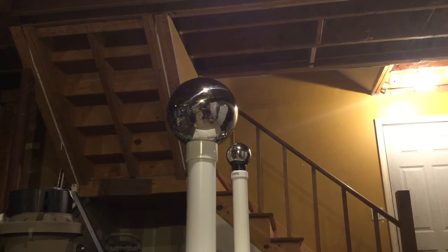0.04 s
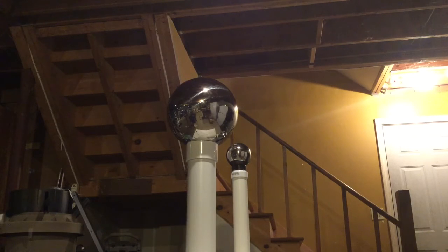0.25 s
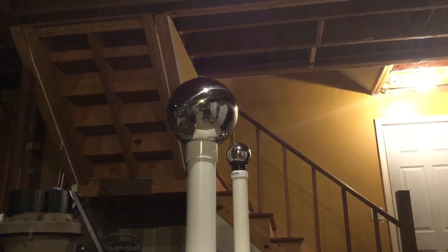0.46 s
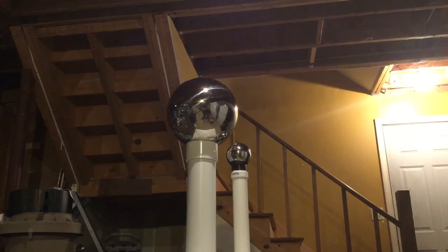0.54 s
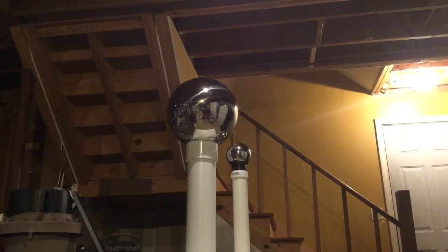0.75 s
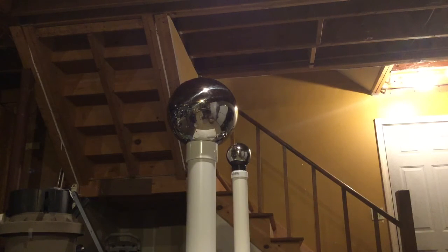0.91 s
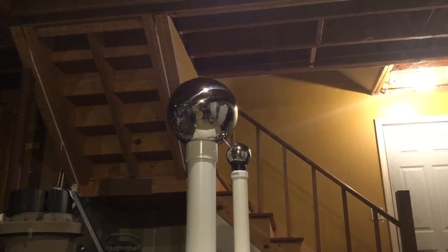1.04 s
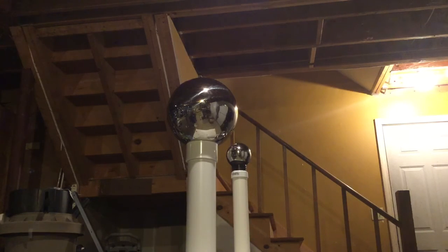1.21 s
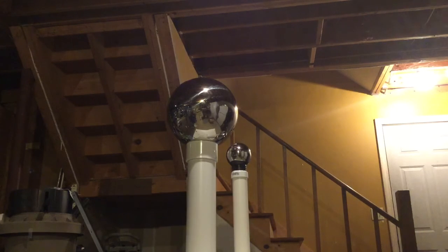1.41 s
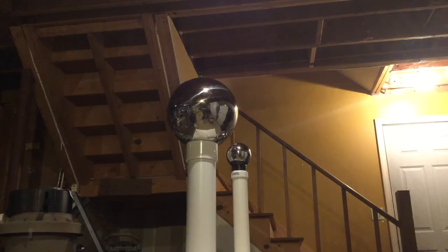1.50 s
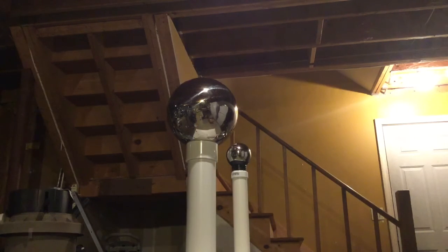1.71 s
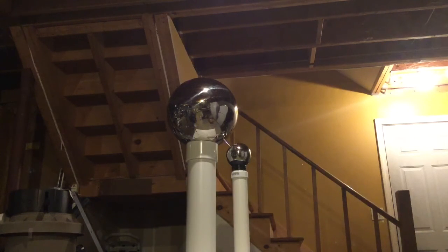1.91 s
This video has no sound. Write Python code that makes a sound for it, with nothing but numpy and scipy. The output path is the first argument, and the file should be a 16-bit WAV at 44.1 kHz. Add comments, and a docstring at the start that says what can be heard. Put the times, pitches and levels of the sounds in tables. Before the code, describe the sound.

Electric sparks snap between two metal spheres four times, evenly spaced. Each bright crack has a short sizzling echo and a thump from the overloaded microphone. A generator's motor and belt hum faintly in a basement room.

```python
"""Sharp electric snaps, about two a second, in a basement room.
An electrostatic generator throws sparks between two metal spheres. Each spark is a bright crack,
a close echo and a short sizzling room tail. Its shock overloads the microphone, which swings back
with a falling thump. The motor and belt run faintly underneath."""
import sys
import numpy as np
from scipy import signal
from scipy.fft import rfft, irfft
from scipy.io import wavfile
from scipy.ndimage import uniform_filter1d

SR = 44100
rng = np.random.default_rng(int(sys.argv[2]) if len(sys.argv) > 2 else 0)


def output_pcm(signal):
    """Save a mono or channel-first signal as 16-bit PCM at the path in sys.argv[1].

    Samples are clipped to [-1, 1] before scaling.
    """
    pcm = np.clip(np.atleast_2d(signal).T, -1, 1) * 32767
    wavfile.write(sys.argv[1], SR, np.round(pcm).astype(np.int16))


N = 85995

# The sparks; the first is already dying away when the sound begins. Each row: start in seconds,
# level of the crack and its tail in dB, thump level in dB, thump pitch factor, midrange bite in dB.
SPARKS = [(-.108, 0, -10, 1.0, 0), (.2079, -1, 4, 1.02, -2), (.6998, 0, .2, .98, 1),
          (1.1607, .5, .6, .99, 1), (1.6022, -.4, 0, .95, -.5)]
WANDER = 0.4  # how much of the room's answer changes with the path of each spark

def sparks():
    """Every spark jumps the same gap, so all share nearly the same reflections."""
    t, out = np.arange(SR // 2) / SR, np.zeros(N)
    shared_tail = np.sqrt(1 - WANDER ** 2) * room(t) + ring(t)
    for start, crack_db, thump_db, pitch, bite_db in SPARKS:
        snap = crack(t, bite_db) + shared_tail + WANDER * room(t)
        add(out, start, amp(crack_db) * snap + amp(thump_db) * thump(t, pitch))
    return out


# Tone colours (how strong the lows and highs are) of the crack, its midrange bite, the close echo
# off a hard surface and the wall echoes. Each row: frequency in Hz, gain in dB.
CRACK_COLOUR = [(150, -25), (1500, -12), (3000, -4), (4800, -4), (7000, -4), (9000, -2), (10500, 0),
                (12700, 10), (14000, 4), (15500, 3), (16800, -6)]
BITE_COLOUR = [(150, 11.5), (400, -2.5), (560, 17.5), (800, 10), (1200, 10.5), (1700, 9.5), (2100, 9),
               (3000, 5), (5000, -18), (16000, -17)]
ECHO_COLOUR = [(150, -14), (1000, -6), (2200, -2), (4200, -5), (5500, 2), (6800, 4), (8500, 3), (10000, 0),
               (12500, 7), (14000, 5), (15500, 0), (16800, -12)]
WALL_COLOUR = [(150, -11), (1000, -5.5), (3000, -13), (6000, -5.5), (13000, -10), (16800, -26)]
# Later echoes from beams and walls. Each row: delay in seconds, gain in dB.
WALL_ECHOES = [(.0105, -9), (.0187, -6), (.024, -10)]
SHOCK_DB, CRACKLE_DB, CRACKLE_S = -1, -4, .0005
BITE_SCATTER, BITE_SCATTER_S = .5, .003
CLOSE_ECHO_S = .00268

def crack(t, bite_db):
    """One shock in the air, with a ragged edge and a midrange bite, then its separate echoes."""
    crackle = rng.standard_normal(len(t)) * np.exp(-t / CRACKLE_S)
    bite = rng.standard_normal(len(t)) * t * np.exp(-2 * t / BITE_SCATTER_S)
    out = amp(CRACKLE_DB) * tint(crackle / np.linalg.norm(crackle), CRACK_COLOUR)
    out += amp(bite_db) * BITE_SCATTER * tint(bite / np.linalg.norm(bite), BITE_COLOUR)
    shock = -amp(SHOCK_DB) * click(CRACK_COLOUR) - amp(bite_db) * click(BITE_COLOUR)
    add(out, 0, shock)
    add(out, CLOSE_ECHO_S, click(ECHO_COLOUR))
    for delay, db in WALL_ECHOES:
        add(out, delay, amp(db) * click(WALL_COLOUR))
    return out


# Nearby surfaces repeat the thump. Each row: delay in seconds, strength (minus flips the wave).
THUMP_ECHOES = [(.0021, 0.047), (.0089, -0.12)]
THUMP_DB, THUMP_RISE_S, THUMP_DECAY_S = -5.5, .0021, .0063
THUMP_DROP_HZ, THUMP_END_HZ, THUMP_FALL_S = 1449, 12, .000472  # at a pitch factor of 1

def thump(t, pitch):
    """The overloaded microphone swings back in a few ever slower cycles."""
    hz = pitch * (THUMP_END_HZ + THUMP_DROP_HZ / (1 + t / THUMP_FALL_S))
    envelope = (1 - np.exp(-t / THUMP_RISE_S)) * np.exp(-t / THUMP_DECAY_S)
    swing = -envelope * np.cos(2 * np.pi * np.cumsum(hz) / SR)
    out = swing.copy()
    for delay, strength in THUMP_ECHOES:
        add(out, delay, strength * swing)
    return amp(THUMP_DB) * out


# Tone colour of the room tail. Each row: frequency in Hz, gain in dB.
ROOM_COLOUR = [(150, -16), (600, -33.5), (1200, -13), (2200, -13), (3300, -12), (5000, -14.5), (7300, -13),
               (8800, -4), (10300, -7.5), (11500, -1.5), (12900, -1), (14200, -4.5), (15400, -7),
               (16200, -57)]
# How long the room rings. Each row: frequency in Hz, seconds to fade by 60 dB.
ROOM_FADE = [(300, 0.1), (2000, 0.21), (5000, 0.3), (9000, 0.23), (13000, .21), (16000, 0.2)]
TAIL_DB, SCATTER_DB = 15, 10  # before the tone colour is applied
TAIL_RISE_S, SCATTER_S, REFLECTION_SPREAD_DB = .005, .002, 4

def room(t):
    """Sound scatters off things close by, then a dense spray of reflections sizzles away."""
    noise = rng.standard_normal(len(t))
    uneven_db = REFLECTION_SPREAD_DB * np.clip(rng.standard_normal(len(t)), -2, 2)
    reflections = unit(noise * amp(uneven_db))
    hz, age, spectrum = signal.stft(reflections, SR, nperseg=256)
    fade = 1e-3 ** (age / look_up(ROOM_FADE, hz)[:, None])
    tail = signal.istft(spectrum * fade, SR)[1][:len(t)]
    tail *= 1 - np.exp(-(t / TAIL_RISE_S) ** 2)
    tail *= amp(TAIL_DB) / np.linalg.norm(tail)
    scatter = rng.standard_normal(len(t)) * np.exp(-t / SCATTER_S)
    scatter *= amp(SCATTER_DB) / np.linalg.norm(scatter)
    return tint(tail + scatter, ROOM_COLOUR)


# The faint high ring after each crack. Each row: frequency in Hz, level in dB.
RING_TONES = [(4829, -47), (8649, -44), (9884, -43), (11230, -42), (12204, -39), (12294, -39), (12583, -40),
              (12952, -36), (13276, -38), (13641, -38)]
RING_FADE_S = .19  # time to fade by 60 dB

def ring(t):
    """Thin tones that die away with the room tail."""
    tones = sum(amp(db) * np.sin(2 * np.pi * (hz * t + rng.random())) for hz, db in RING_TONES)
    return tones * (1 - np.exp(-t / TAIL_RISE_S)) * 1e-3 ** (t / RING_FADE_S)


# Tone colour of the rumble. Each row: frequency in Hz, gain in dB.
RUMBLE_COLOUR = [(20, -58), (40, -34.5), (74, -3), (120, -5.5), (160, -13), (215, -5), (300, -8.5),
                 (430, -8), (600, -4.5), (800, -8.5), (1740, -8.5), (3500, -19.5), (7700, -32.5),
                 (9500, -26.5), (13200, -28), (16000, -53)]
# The rumble sinks and rises again. Each row: time in seconds, dB added to RUMBLE_DB.
RUMBLE_LEVEL = [(0, 3), (.15, 1.5), (.33, 1), (.48, 2), (.56, -1), (.65, 2.5), (.85, -0.5), (.98, 2.5),
                (1.1, 2), (1.32, -1), (1.47, 2), (1.56, 2), (1.72, 0), (1.95, 1)]
RUMBLE_DB, PATCHY_DB = -55, 2

def motor_rumble(t):
    """Motor and belt rumble unevenly: noise with random louder and softer patches."""
    spectrum = signal.stft(rng.standard_normal(N), nperseg=1024)[2]
    patches = uniform_filter1d(rng.standard_normal(spectrum.shape), size=12, axis=0)  # smooth in pitch
    patches = unit(uniform_filter1d(patches, size=6, axis=1))  # and in time
    noise = signal.istft(spectrum * amp(PATCHY_DB * patches))[1][:N]
    level_db = RUMBLE_DB + np.interp(t, *np.transpose(RUMBLE_LEVEL))
    return amp(level_db) * unit(tint(noise, RUMBLE_COLOUR))


# Swells of the rumble. Each row: time of the peak in seconds, length in seconds, pitch in Hz, level in dB.
SWELLS = [(0.12, 0.16, 114, -56.5), (0.055, 0.072, 296, -54.5), (0.623, 0.12, 293, -56.5),
          (1.11, 0.24, 330, -59.5)]
SWELL_WIDTH = 0.36  # spread to either side, as a share of the pitch

def rumble_swells(t):
    """A narrow band of the low rumble rises briefly now and then."""
    out, hz = np.zeros(N), np.fft.rfftfreq(N, 1 / SR)
    for peak_s, length, centre_hz, db in SWELLS:
        band = shaped_noise(np.exp(-((hz / centre_hz - 1) / SWELL_WIDTH) ** 2))
        out += amp(db) * band * np.exp(-(2 * (t - peak_s) / length) ** 2)
    return out


# The motor's tones. Each row: frequency in Hz, average level in dB.
HUM_TONES = [(119, -71), (228, -71), (307, -72), (598, -64), (1244, -73), (1351, -74), (1717, -71)]
HUM_WAVER_HZ, HUM_FLUTTER, HUM_DRIFT_HZ = 2.5, .25, 5

def motor_hum():
    """The motor hums with tones that each waver in loudness and pitch."""
    out = np.zeros(N)
    slow = np.exp(-(np.fft.rfftfreq(N, 1 / SR) / HUM_DRIFT_HZ) ** 2)
    for centre_hz, db in HUM_TONES:
        level = amp(db) * (1 + HUM_FLUTTER * shaped_noise(slow))
        hz = centre_hz + HUM_WAVER_HZ * shaped_noise(slow)
        out += level * np.sqrt(2) * np.sin(2 * np.pi * np.cumsum(hz) / SR)
    return out


# Tone colour of the hiss. Each row: frequency in Hz, gain in dB.
HISS_COLOUR = [(1000, 6.5), (2500, -28.5), (4500, 5), (6500, -3), (9000, -7), (16000, -53)]
# Loudness of the hiss. Each row: time in seconds, level in dB.
HISS_LEVEL = [(0, -54.5), (.11, -69), (.17, -62), (.38, -68), (.5, -61), (.6, -75), (.8, -66), (.9, -65),
              (1.02, -67), (1.1, -65), (1.37, -64.5), (1.44, -90), (1.56, -59.5), (1.78, -63.5),
              (1.95, -69)]

def hiss(t):
    """A faint hiss comes and goes."""
    level_db = np.interp(t, *np.transpose(HISS_LEVEL))
    return amp(level_db) * unit(tint(rng.standard_normal(N), HISS_COLOUR))


def amp(db):
    """Turns decibels into a number to multiply by."""
    return 10 ** (np.asarray(db) / 20)


def unit(x):
    """Scales a signal to an average strength (rms) of 1."""
    return x / np.sqrt(np.mean(x ** 2) + 1e-20)


def look_up(table, hz):
    """Reads between a table's rows on a log-frequency axis."""
    row_hz, value = np.transpose(table)
    return np.interp(np.log(hz + 1), np.log(row_hz + 1), value)


def add(mix, start_s, sound):
    """Mixes a sound in at start_s; any part before time zero is cut off."""
    at = round(start_s * SR)
    sound = sound[max(-at, 0):]
    part = mix[max(at, 0):][:len(sound)]
    part += sound[:len(part)]


TREBLE_EDGE_HZ, SMEAR_S = 16500, .00015

def click(colour, size=2048):
    """A sudden click with the given tone colour; its highest treble arrives slightly late."""
    hz = np.fft.fftfreq(size, 1 / SR)
    log_gain = np.log(amp(look_up(colour, abs(hz))))
    log_spectrum = np.conj(signal.hilbert(log_gain))  # packs the energy at the start
    lag = np.pi * SMEAR_S * hz * (hz / TREBLE_EDGE_HZ) ** 2
    return np.fft.ifft(np.exp(log_spectrum - 1j * lag)).real


def tint(x, colour):
    """Gives a sound a tone colour."""
    return signal.fftconvolve(x, click(colour))[:len(x)]


def shaped_noise(gains):
    """Noise of strength 1, with each frequency weighted by its gain."""
    return unit(irfft(rfft(rng.standard_normal(N)) * gains, N))


def scene():
    """Loud sparks over the quiet machine, in one channel."""
    t = np.arange(N) / SR
    return (sparks() + motor_rumble(t) + motor_hum() + hiss(t) + rumble_swells(t))[None]


def record(dry):
    """The loudest peaks are squashed; then the highest treble is cut away."""
    ceiling = 0.89
    squashed = ceiling * np.tanh(dry / ceiling)
    low_pass = signal.firwin(255, TREBLE_EDGE_HZ, window=("kaiser", 9), fs=SR)
    return signal.oaconvolve(squashed, low_pass[None], "same")


dry = scene()
out = record(dry)
output_pcm(out)
```